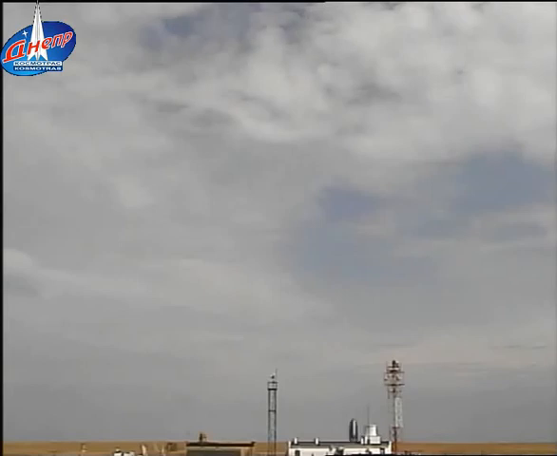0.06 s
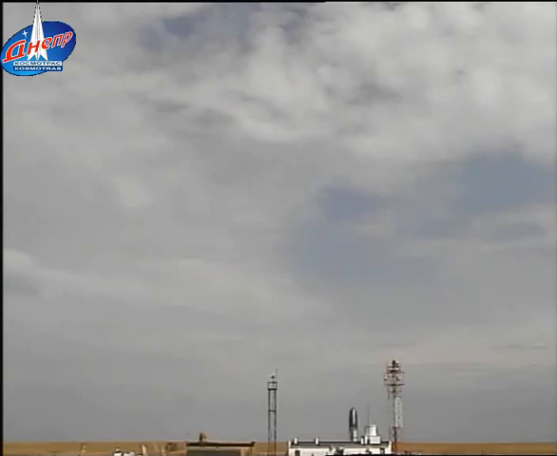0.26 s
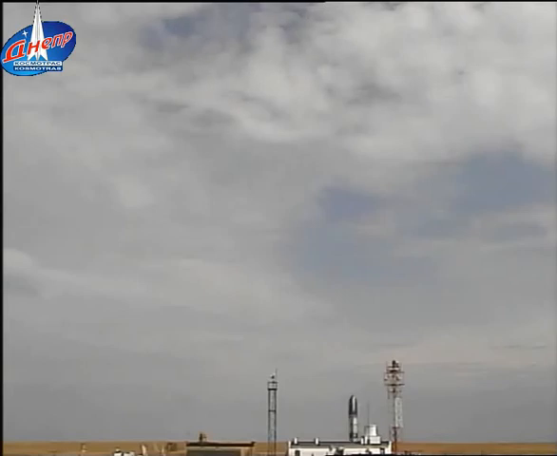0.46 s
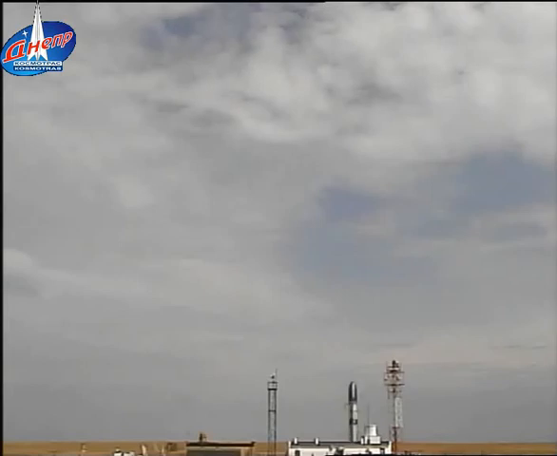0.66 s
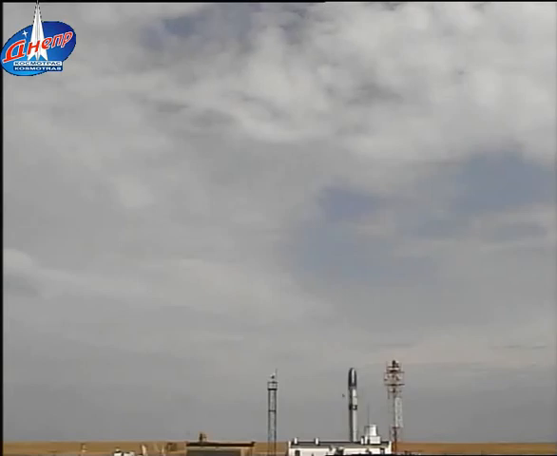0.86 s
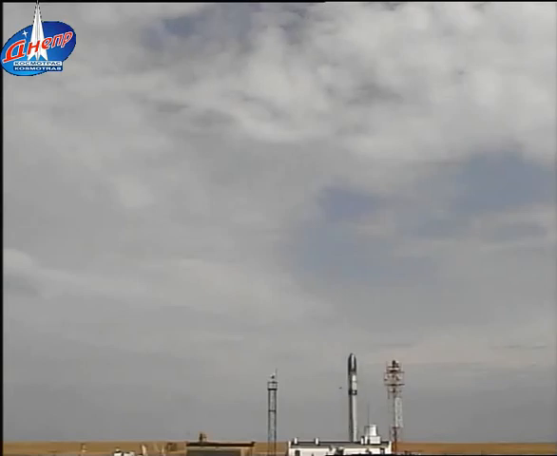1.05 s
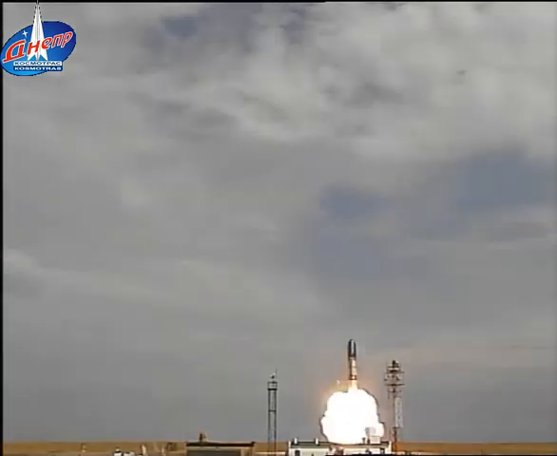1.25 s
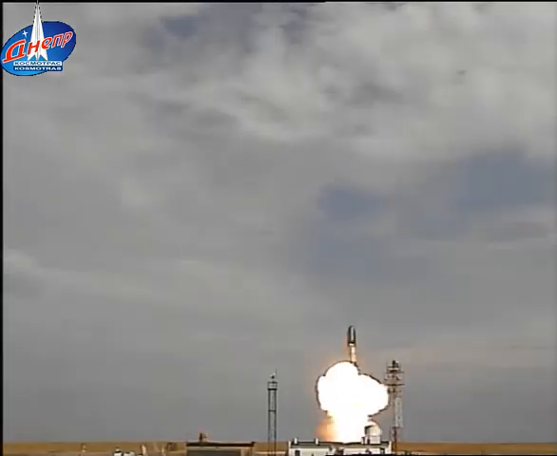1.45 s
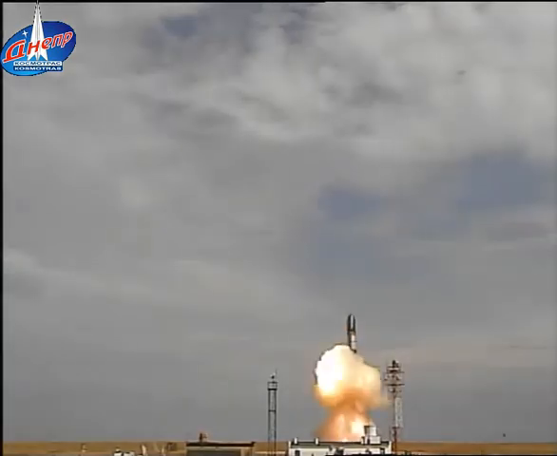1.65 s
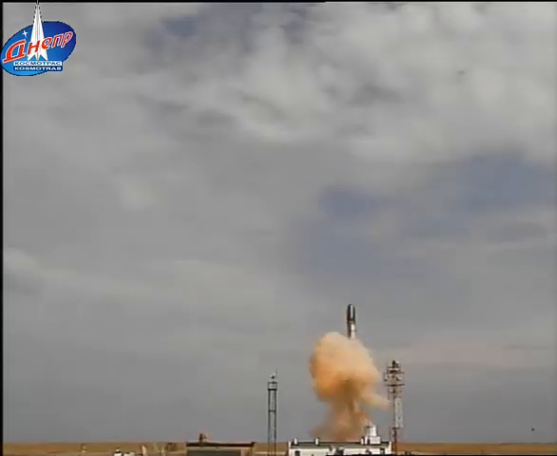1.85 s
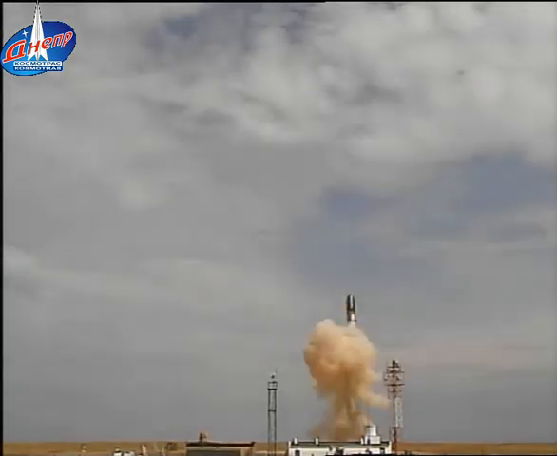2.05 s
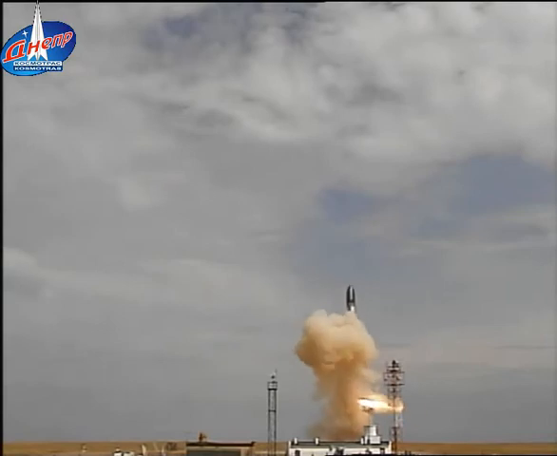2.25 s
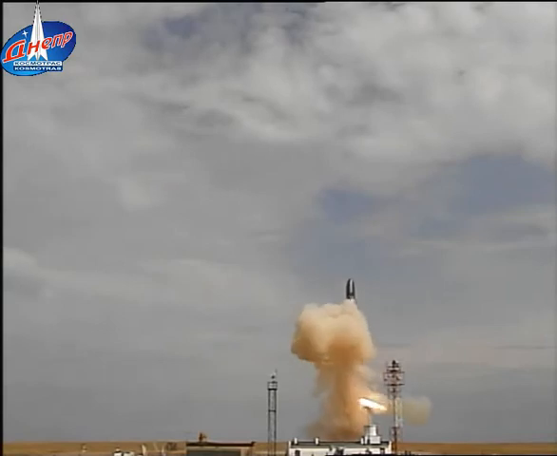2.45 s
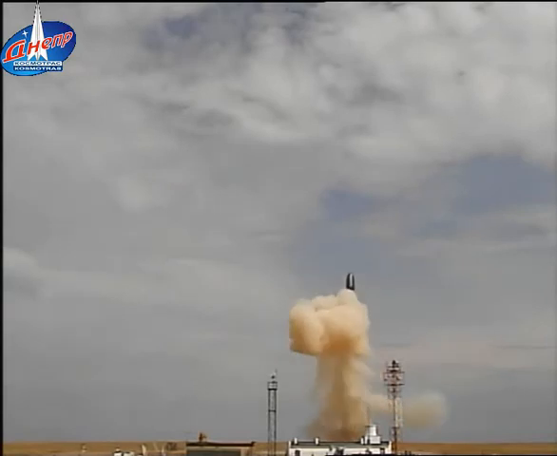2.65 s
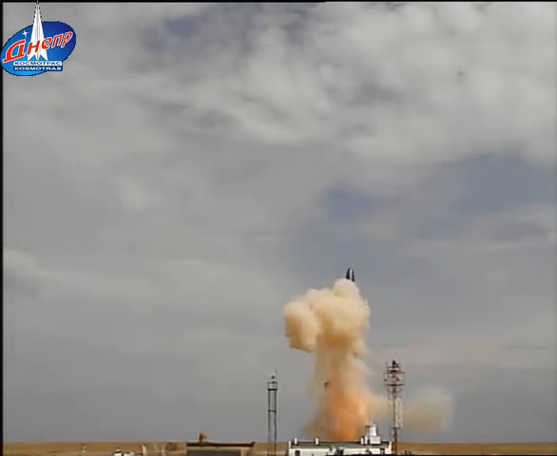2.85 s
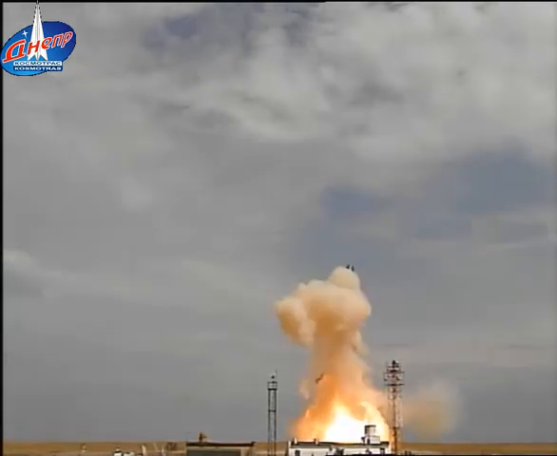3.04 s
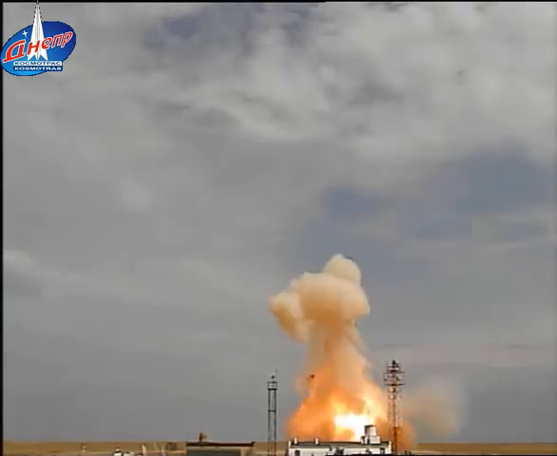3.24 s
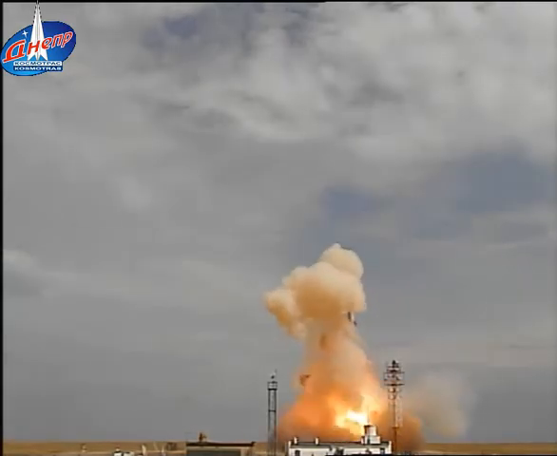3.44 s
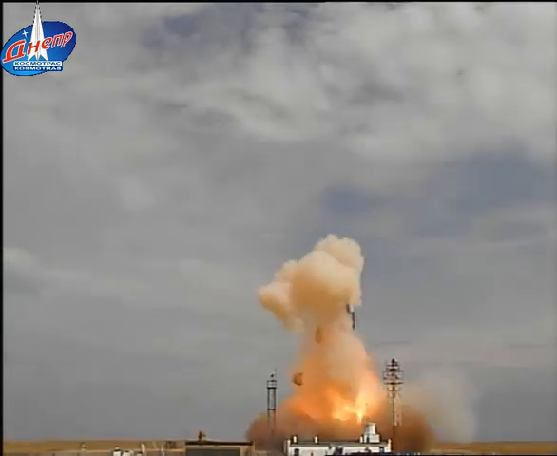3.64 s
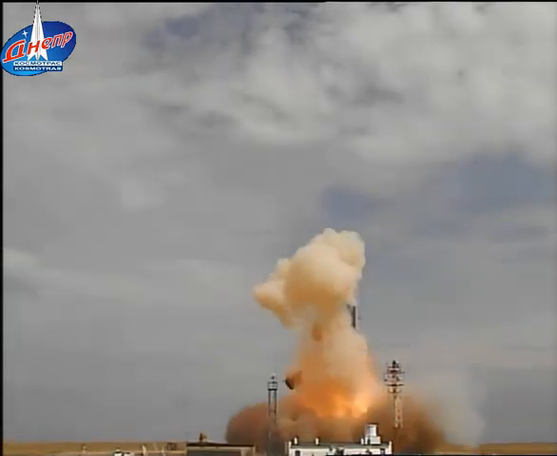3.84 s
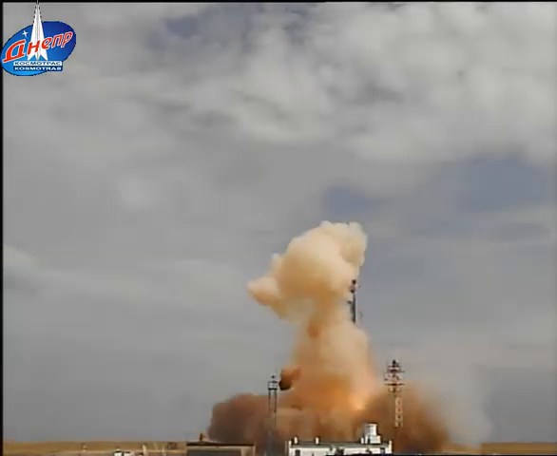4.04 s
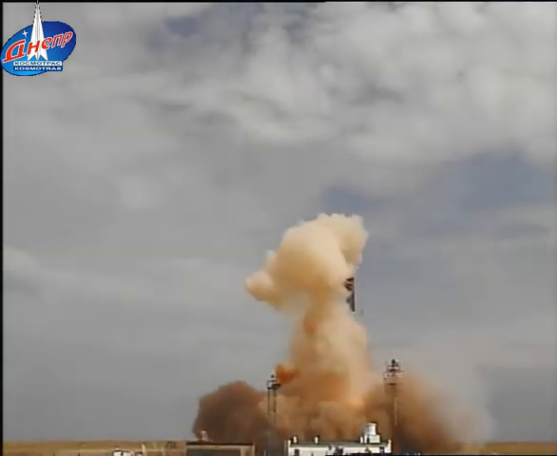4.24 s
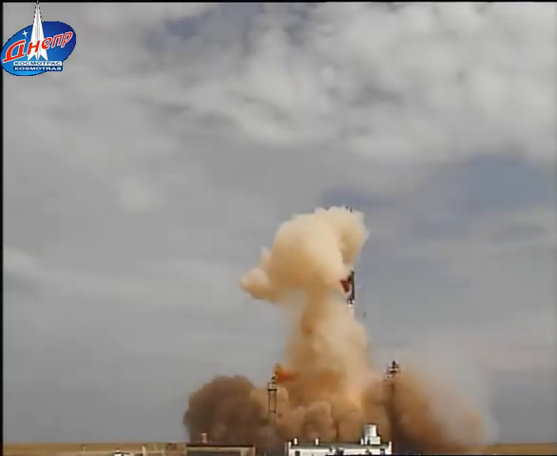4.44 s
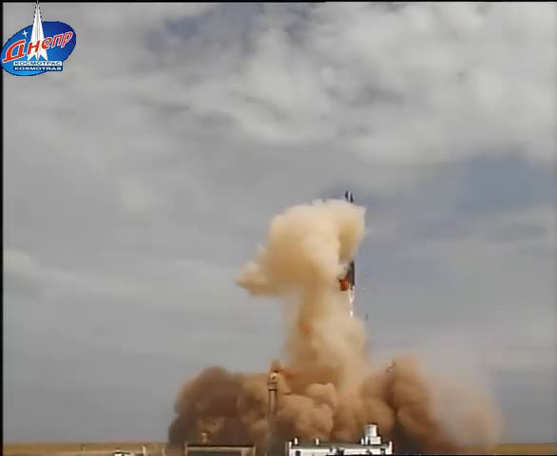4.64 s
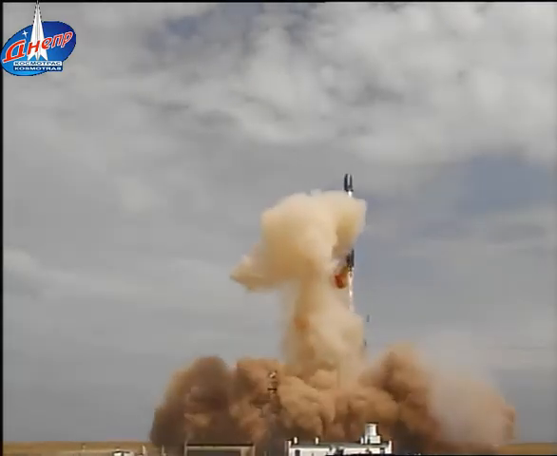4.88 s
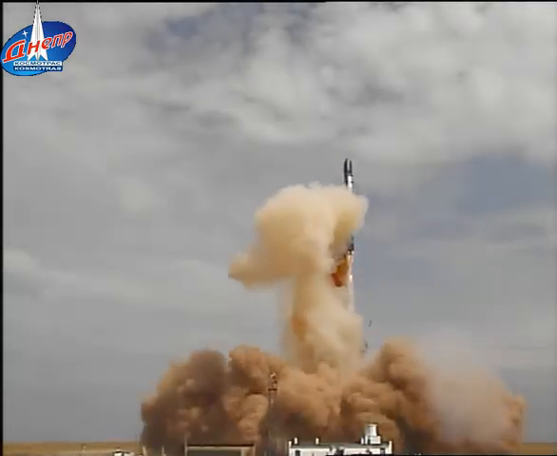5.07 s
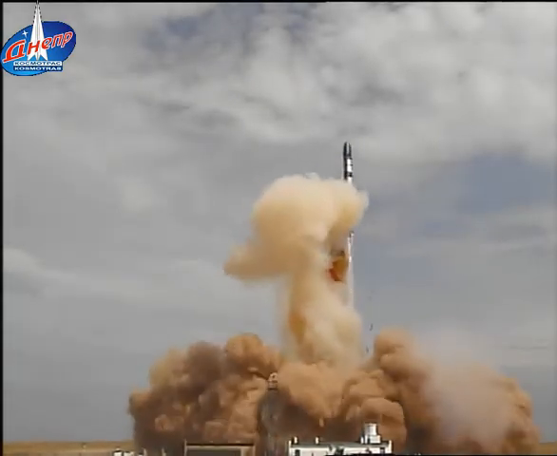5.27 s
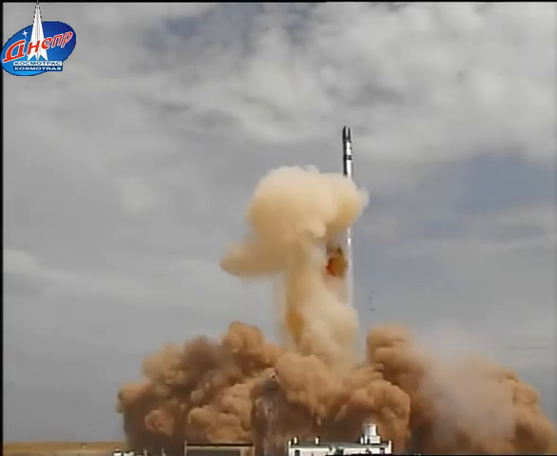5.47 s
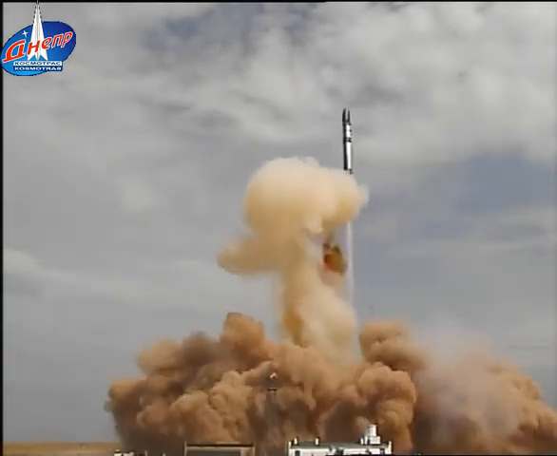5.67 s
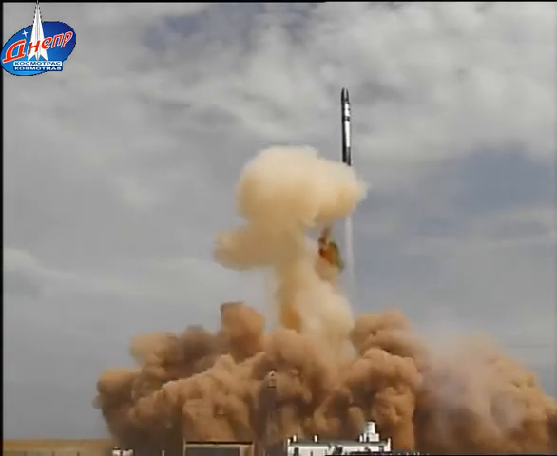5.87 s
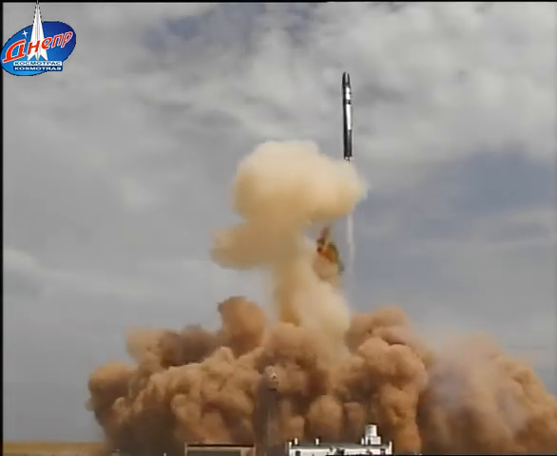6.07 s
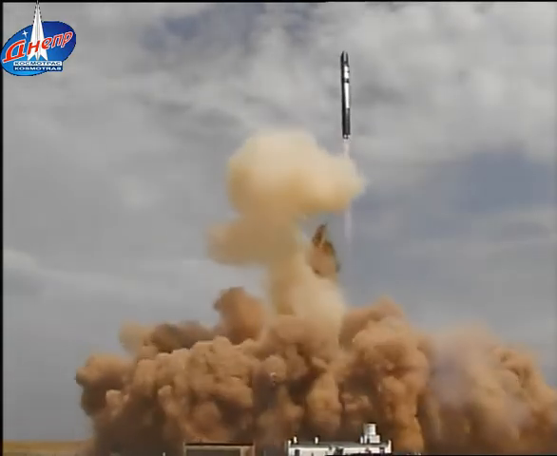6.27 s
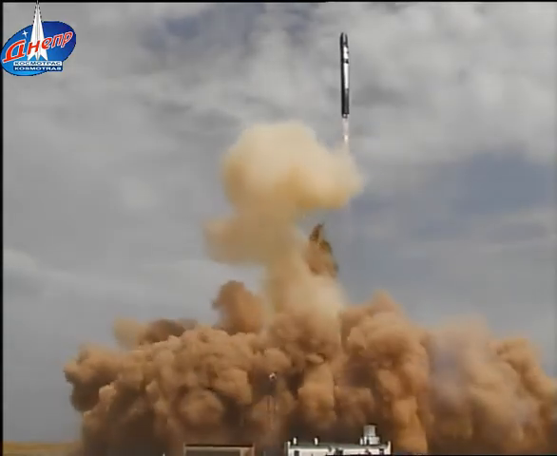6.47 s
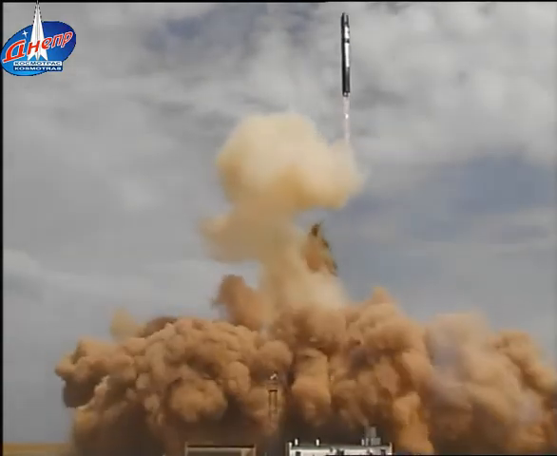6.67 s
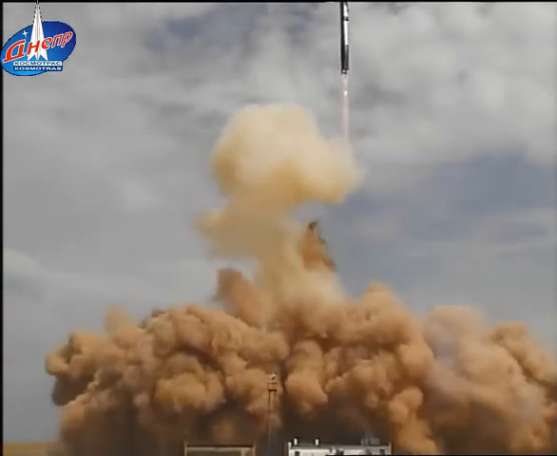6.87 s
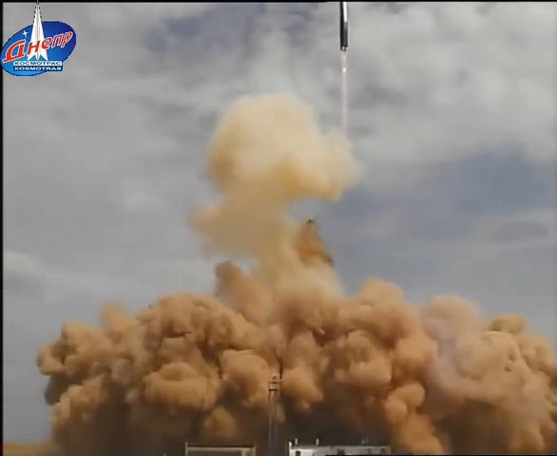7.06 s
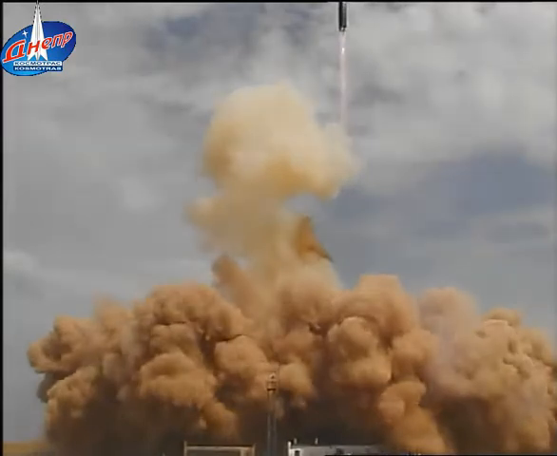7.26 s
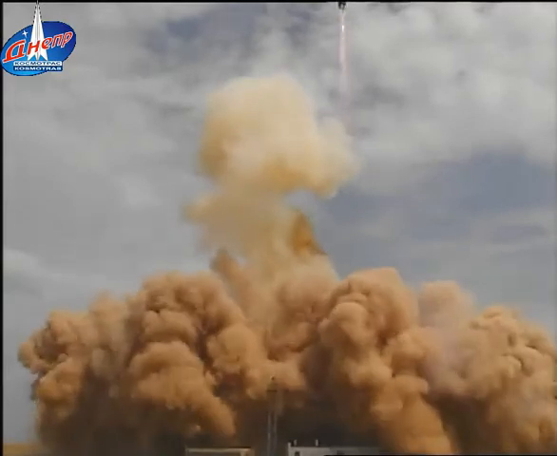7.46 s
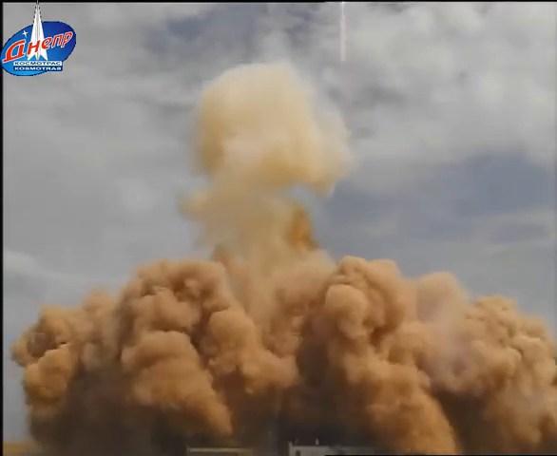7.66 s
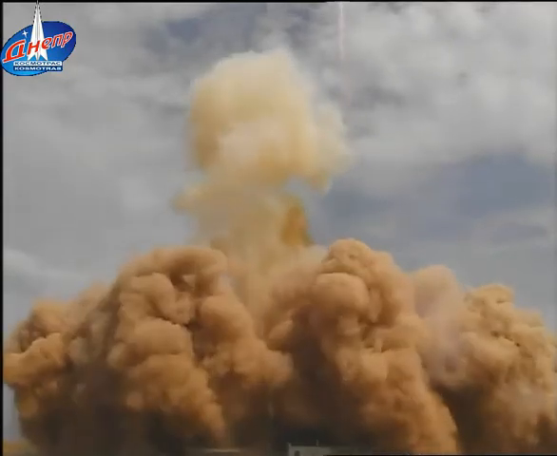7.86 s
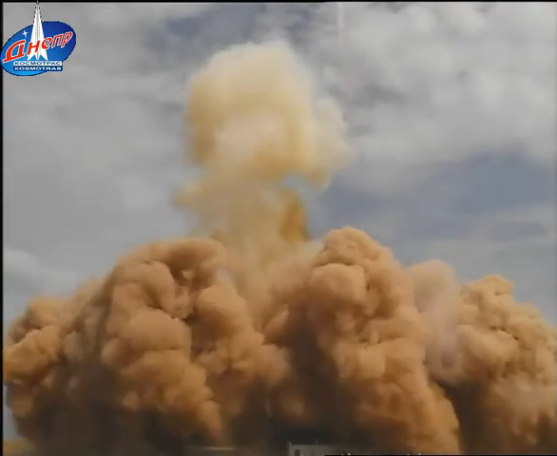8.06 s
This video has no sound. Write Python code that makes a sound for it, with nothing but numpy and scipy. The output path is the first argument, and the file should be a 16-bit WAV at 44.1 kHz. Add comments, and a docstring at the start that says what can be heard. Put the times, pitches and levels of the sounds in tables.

```python
"""Open plain, distant microphone in the wind: a rocket is thrown out of its silo with a bang.
A small motor roars briefly, then the main engines light with blast waves and the rocket climbs.
Blast waves and clumps of exhaust shocks overload the microphone into a harsh rasp over roar and rumble;
the rasp breaks up into single cracks as the rocket leaves. The sources are shaped noise and pulses,
and the sound channel is narrow and clips."""
import sys
import numpy as np
from scipy import signal
from scipy.fft import rfft, irfft, next_fast_len
from scipy.io import wavfile
from scipy.ndimage import uniform_filter1d, map_coordinates

SR = 44100
rng = np.random.default_rng(int(sys.argv[2]) if len(sys.argv) > 2 else 0)


def bounce(signal):
    """Save signal as a 16-bit WAV file at the path given by the first command-line argument."""
    frames = np.transpose(np.atleast_2d(signal))
    limited = np.clip(frames, -1, 1)
    pcm = np.round(limited * 32767).astype(np.int16)
    wavfile.write(sys.argv[1], SR, pcm)


N = 357651


def amp(db):
    """Decibels to gain."""
    return 10 ** (np.asarray(db) / 20)


def unit(x):
    """x at rms 1."""
    return x / np.sqrt(np.mean(x ** 2) + 1e-20)


def clock():
    """The time of every sample (s)."""
    return np.arange(N) / SR


def wobble(rate):
    """A smooth random curve of rms 1, with rate knots a second."""
    knots = rng.standard_normal(int(N * rate / SR) + 4)
    return unit(map_coordinates(knots, [clock() * rate]))


def filtered(x, response):
    """x times a response of frequency, zero-padded so that its end does not wrap round."""
    m = next_fast_len(N + SR // 2)
    hz = np.fft.rfftfreq(m, 1 / SR)
    return irfft(rfft(x, m) * response(hz), m)[:N]


def coloured(x, spectrum):
    """x shaped by (f/Hz, level/dB) points on a log frequency axis."""
    f, db = np.transpose(spectrum)
    return filtered(x, lambda hz: amp(np.interp(np.log(hz + 1), np.log(f), db)))


def narrow(x, edge_hz=4020, slope_hz=85):
    """The steep upper edge of the narrow sound channel."""
    return filtered(x, lambda hz: .5 - .5 * np.tanh((hz - edge_hz) / (2 * slope_hz)))


def noise(spectrum):
    """Coloured noise whose part inside the channel's band has rms 1."""
    x = coloured(rng.standard_normal(N), spectrum)
    return x / np.std(narrow(x))


def burst(start, t60, attack=0.0003):
    """A sudden rise and an exponential decay; all times in s."""
    t = np.maximum(clock() - start, 0)
    rise = 1 - np.exp(-t / attack)
    return rise * amp(-60 * np.minimum(t / t60, 3))


def swell(peak_s, half_length):
    """A smooth rise and fall, 1 at its peak; half_length in s."""
    return np.exp(-((clock() - peak_s) / half_length) ** 2)


def burn(start, attack, sag_db_per_s, end, fall_db_per_s):
    """A flame's envelope: it builds up, sags slowly, and falls off from its end on."""
    t = clock()
    rise = np.clip((t - start) / attack, 0, 1) ** 2
    sag_db = sag_db_per_s * np.maximum(t - start, 0)
    fall_db = fall_db_per_s * np.maximum(t - end, 0)
    return rise * amp(-sag_db - fall_db)


# the main engines light, and the rocket climbs away: t/s
IGNITION_S, CLIMB_S = 2.905, 5.54
# relative spectrum of the jet at the distant microphone: f/Hz, level/dB per Hz
ROAR_SPECTRUM = [(25, -29), (70, -10), (150, -5), (280, -0.6), (500, -2.5), (800, -0.2), (1400, -2),
                 (1900, -9), (2400, -8.5), (3100, -14), (4000, -25.5)]


def roar(level_db=-11, surge_db=0.9, flutter_db=1.42, clump_db=0.9, clump_s=0.049, full_clump_s=.011):
    """The turbulent jet surges, flutters, swells around longer shock clumps and fades with the climb."""
    flame = burn(IGNITION_S - .015, attack=0.065, sag_db_per_s=0.03, end=CLIMB_S, fall_db_per_s=1.67)
    near_clump = sum(length / full_clump_s * swell(s, clump_s)
                     for s, length, db in SHOCK_CLUMPS if s > CLIMB_S)
    level = amp(level_db + clump_db * np.minimum(near_clump, 1))
    turbulence = unit(amp(surge_db * wobble(25) + flutter_db * wobble(220)))
    return level * flame * turbulence * noise(ROAR_SPECTRUM)


# the dense stream of shocks sets in, and has thinned to half: t/s
STREAM_START_S, STREAM_END_S = 2.955, 6.02


def shock_share(build_s=.17, first_share=0.96, sag_per_s=0.06, thinning_s=0.055,
                stray_share=0.17, stray_s=.4):
    """The stream's approximate share of overloaded time builds up, sags, then thins to a few strays."""
    t = clock()
    age = t - STREAM_START_S
    held = np.clip(age / build_s, 0, 1) * (first_share - sag_per_s * age)
    stream = held * (.5 - .5 * np.tanh((t - STREAM_END_S) / (2 * thinning_s)))
    return np.maximum(stream, stray_share * swell(STREAM_END_S, stray_s))


# the clearest separate clumps of shocks, before their steep front and scatter:
# t/s, length/s, level/dB
SHOCK_CLUMPS = [(2.962, .006, -8.5), (5.988, 0.023, -7), (6.062, 0.023, -8), (6.145, .065, -6.5),
                (6.228, 0.033, -7), (6.306, .025, -8.5), (6.346, .014, -7), (6.379, 0.017, -6.5),
                (6.421, .006, -6), (6.449, 0.024, -6), (6.481, 0.0093, -8.5), (6.526, .013, -8),
                (6.569, 0.013, -7), (6.604, .027, -6.5), (6.645, 0.0097, -9), (6.663, 0.0011, -4.5),
                (6.731, 0.00088, -8), (6.84, .01, -7), (6.875, .0022, -4.5), (6.932, .0014, -8.5),
                (6.988, 0.0062, -7), (7.064, 0.0063, -8.5), (7.105, 0.0016, -10), (7.148, 0.0017, -7.5),
                (7.256, 0.005, -5.5), (7.295, 0.00086, -6.5), (7.334, 0.0099, -8), (7.409, .011, -6),
                (7.447, .005, -7.5), (7.531, 0.001, -8.5), (7.832, .013, -6), (7.862, .011, -7.5),
                (7.903, .0097, -7), (7.948, .003, -9.5)]


def shocks(clump_rate=180, shock_rate=540, stream_db=-6.0, front_db=3, front_s=0.00085,
           scatter_db=1.03, edge_s=0.0004):
    """When shocks overload the microphone (0-1), and how hard: a dense stream and separate clumps."""
    t = clock()
    grouping = unit(wobble(clump_rate) + wobble(shock_rate))
    chance = .5 + .5 * np.tanh(0.88 * grouping)  # near evenly spread over 0-1
    overload = 1. * (chance < shock_share())
    strength = overload * amp(stream_db)
    for s, length, db in SHOCK_CLUMPS:
        inside = (t >= s) & (t < s + length)
        front = front_db * np.exp(-(t[inside] - s) / front_s)  # the first shock of a clump is the steepest
        overload[inside] = 1
        strength[inside] = amp(db + front)
    strength *= amp(scatter_db * wobble(shock_rate))  # no two shocks are equally strong
    return uniform_filter1d(np.array([overload, strength]), max(int(edge_s * SR), 1), axis=1)


# relative spectrum of the overloaded microphone, before its limiting: f/Hz, level/dB per Hz
RASP_SPECTRUM = [(25, 1), (300, -1), (1500, -0.1), (2500, 1.56), (3200, 3.5), (3650, 5), (4200, -3)]


def rasp(drive=1.53):
    """The overloaded microphone chatters at nearly constant height: noise levelled by its envelope."""
    chatter = signal.hilbert(narrow(noise(RASP_SPECTRUM), edge_hz=4670), next_fast_len(N))[:N]
    return unit(chatter.real / np.sqrt(1 + np.abs(drive * chatter) ** 2))


# ignition blast waves on the microphone: t/s, push length/s, suction length/s
BLAST_WAVES = [(3.013, .017, 0.01), (3.516, .018, 0.0063)]


def blast_waves(push=1.4):
    """Each wave jumps to full pressure, slides back to zero, then sucks; 1 is full diaphragm travel."""
    t, wave = clock(), np.zeros(N)
    for s, push_s, suction_s in BLAST_WAVES:
        u = (t - s) / push_s
        pushing = (u >= 0) & (u < 1)
        sucking = (u >= 1) & (t < s + push_s + suction_s)
        wave += push * (1 - u) ** 2 * pushing
        wave -= sucking
    return uniform_filter1d(np.clip(wave, -1, 1), size=24)  # softened edges


# relative spectrum of the thud and rumble: f/Hz, level/dB per Hz
RUMBLE_SPECTRUM = [(20, -22), (65, 3.5), (150, 2), (290, 1), (420, -12.5), (1000, -29)]


def rumble(thud_db=-7, thud_t60=0.53, climb_db=-18.7, peak_s=5.94, half_length=1.6, throb_db=3.0):
    """A deep thud at ignition; a second swell as the rising jet turns its low end to the ground."""
    thud = amp(thud_db) * burst(IGNITION_S + .035, thud_t60, attack=0.011)
    climb = amp(climb_db) * swell(peak_s, half_length)
    return (thud + climb) * unit(amp(throb_db * wobble(24)) * noise(RUMBLE_SPECTRUM))


# gas starts to flow through the main engines: t/s
FLOW_S = 2.77
# relative spectrum shared by the gas flow and the small motor: f/Hz, level/dB per Hz
BURN_SPECTRUM = [(35, -36), (90, -9.5), (165, -15), (240, 0), (340, 1), (560, 0), (830, 3.5), (1250, 0.5),
                 (1900, -7.5), (3000, -12.5), (4000, -27)]


def gas_flow(level_db=-35.0):
    """Gas rushes through the main engines just before they light, growing slightly."""
    flow = burn(FLOW_S, attack=0.043, sag_db_per_s=-1, end=IGNITION_S, fall_db_per_s=61)
    return amp(level_db) * flow * noise(BURN_SPECTRUM)


# the small motor: start t/s, burnout t/s, level/dB before its sag and flutter
MOTOR_START_S, MOTOR_BURNOUT_S, MOTOR_DB = 2.255, 2.58, -15


def motor(flutter_db=1.1):
    """A small solid motor lights, burns for a moment and dies away."""
    flame = burn(MOTOR_START_S, attack=0.052, sag_db_per_s=12.5, end=MOTOR_BURNOUT_S, fall_db_per_s=105)
    return amp(MOTOR_DB + flutter_db * wobble(70)) * flame * noise(BURN_SPECTRUM)


# ejection charge and igniters, before soft limiting:
# t/s, rms level/dB, t60/s, centre f/Hz, thump level/dB
REPORTS = [(1.1963, -7, 0.0082, 1000, -39), (1.2, -27, 0.3, 1100, -40), (1.221, -14.5, .17, 1100, -25),
           (1.231, -8, 0.036, 800, -12), (1.245, -8, 0.071, 1000, -17), (1.258, -8.5, 0.14, 1520, -32),
           (1.287, -16.5, .28, 1040, -31), (2.269, -26.5, 0.076, 700, -22), (2.284, -20, .08, 800, -15),
           (2.297, -16, .05, 750, -26), (2.905, -20.5, .12, 1000, -34)]
# relative spectrum of a report: multiple of its centre f, level/dB per Hz
REPORT_SPECTRUM = [(.03, -20), (.2, 0.5), (.45, -4), (1, 2.5), (1.45, -0.5), (2.1, -15), (2.8, -15.5),
                   (3.7, -24.5)]
# relative spectrum of the low thumps: f/Hz, level/dB per Hz
THUMP_SPECTRUM = [(25, -7), (70, -23), (200, -14), (400, -28), (1000, -37), (4000, -60)]


def reports(thump_t60=0.12, highest=.5):
    """The gas charge bursts out in sharp reports and low thumps; each igniter adds a small one."""
    sound, low = np.zeros(N), noise(THUMP_SPECTRUM)
    for s, db, t60, centre_hz, thump_db in REPORTS:
        crack = noise(np.multiply(REPORT_SPECTRUM, [centre_hz, 1]))
        sound += amp(db) * burst(s, t60) * crack
        sound += amp(thump_db) * burst(s, thump_t60, attack=0.00075) * low
    # the tallest peaks of the reports are softly limited
    return highest * np.tanh(narrow(sound) / highest)


# sound rolling back from the plain: t/s, level/dB before its build-up and decay, t60/s
PLAIN_ECHOES = [(1.26, -28, 2.08), (2.4, -22.5, 1.6)]
# relative spectrum of the returning sound: f/Hz, level/dB per Hz
ECHO_SPECTRUM = [(100, -34), (280, -23), (450, -8.5), (850, -6.5), (1550, -10), (2500, -15), (3050, -13.5),
                 (4000, -27.5)]


def plain():
    """The open plain rolls the bang and the motor's burn back as decaying noise."""
    tails = sum(amp(db) * burst(s, t60, attack=.03) for s, db, t60 in PLAIN_ECHOES)
    return tails * noise(ECHO_SPECTRUM)


BREEZE_DB = -47.5  # level/dB of the wind between the gusts
# gusts on the microphone, on top of the breeze: peak t/s, half-length/s, level/dB
WIND_GUSTS = [(0.062, 0.071, -40.5), (0.3, 0.067, -37), (0.46, 0.058, -42), (0.834, 0.23, -41.5),
              (1.243, 0.12, -35.5), (2.027, .08, -42), (2.4, 0.15, -45), (2.87, 0.11, -52)]


def gustiness():
    """The wind's strength at the microphone: gusts over a light breeze."""
    gusts = sum(amp(db) * swell(s, half_length) for s, half_length, db in WIND_GUSTS)
    return amp(BREEZE_DB) + gusts


# the strongest eddies that pat the diaphragm: t/s, relative level/dB
WIND_PATS = [(.073, -25.5), (.286, -26.5), (.3, -24.5), (.497, -27), (.528, -27.5), (.794, -29.5),
             (.866, -27), (1.123, -31.5), (1.42, -24.5), (1.942, -24.5), (2.001, -25.5), (2.052, -27),
             (2.077, -27), (2.114, -29)]
# relative spectrum of the wind's buffeting: f/Hz, level/dB per Hz
BUFFET_SPECTRUM = [(20, -9), (60, 5.5), (130, 1.5), (250, -4), (500, -22), (1000, -20.5), (3000, -26)]


def wind(buffet_db=0, lumps_db=5.5, pat_db=2.3, pat_t60=0.03):
    """Lumpy buffeting, and soft pats that push or pull the diaphragm."""
    lumpy = unit(noise(BUFFET_SPECTRUM) * amp(lumps_db * wobble(60)))
    buffet = amp(buffet_db) * gustiness() * lumpy
    pats = sum(rng.choice([-1, 1]) * amp(db + pat_db) * burst(s, pat_t60, attack=0.00052)
               for s, db in WIND_PATS)
    return buffet + coloured(pats, [(10, -10), (50, 4.5), (1000, 9.0), (3000, -6)])


# relative spectrum of the hiss: f/Hz, level/dB per Hz
HISS_SPECTRUM = [(30, 0.19), (600, 0.55), (1500, -2), (4000, -1.6)]


def air(hiss_db=-53.0, tick_db=-49, gust_share=0.42, grain_db=2, tick_rate=900):
    """A grainy hiss; tiny eddies, tick_rate a second, tick on the diaphragm, harder in the gusts."""
    hiss = unit(noise(HISS_SPECTRUM) * amp(grain_db * wobble(150)))
    ticks = (rng.random(N) < tick_rate / SR) * rng.exponential(size=N)
    ticks = coloured(ticks, [(10, -37), (60, -8), (200, -6), (500, -2.5), (1200, -12.5), (4000, -16.5)])
    ticks = unit(narrow(ticks))
    tick_level = amp(tick_db) * (gustiness() / amp(BREEZE_DB)) ** gust_share
    return amp(hiss_db) * hiss - tick_level * ticks


def scene(masking=0.38, travel=.74):
    """Rasp replaces part of the roar and rumble; a blast wave pins the diaphragm and chokes the engines."""
    overload, strength = shocks()
    blast = blast_waves()
    jet = (roar() + rumble()) * (1 - masking * overload)
    engines = gas_flow() + jet + strength * rasp()
    at_microphone = engines * (1 - np.abs(blast)) ** 2 + travel * blast
    return at_microphone + reports() + motor() + plain() + wind() + air()


# relative response after the clipping: f/Hz, level/dB
OUTPUT_RESPONSE = [(5000, -1), (9000, -2), (12500, -1), (16000, -1)]


def record(dry, ceiling=0.76, hardness=14, top_hz=16100):
    """A narrow channel, then an amplifier whose clipping adds the only treble."""
    x = narrow(dry, edge_hz=4202, slope_hz=88)
    clipped = x / (1 + np.abs(x / ceiling) ** hardness) ** (1 / hardness)
    return filtered(coloured(clipped, OUTPUT_RESPONSE), lambda hz: hz < top_hz)


dry = scene()
out = record(dry)
bounce(out)
```